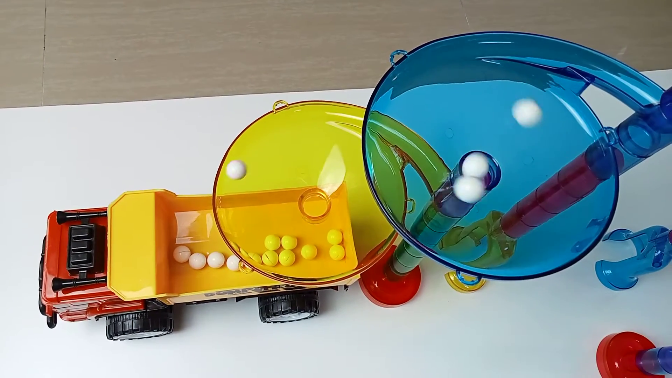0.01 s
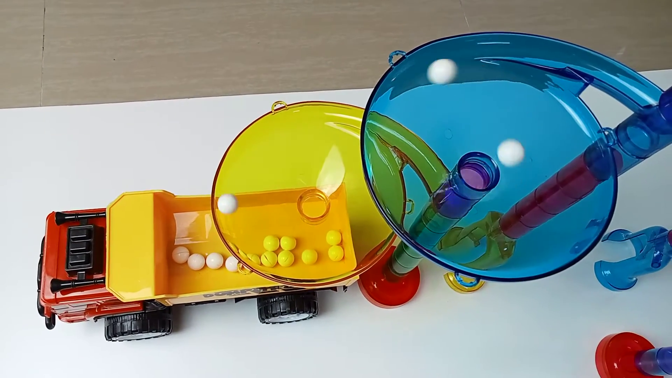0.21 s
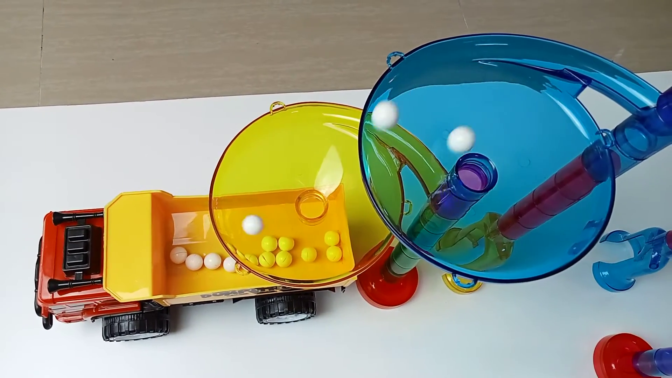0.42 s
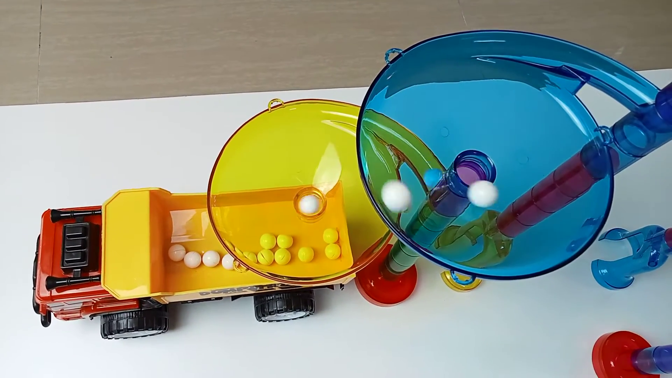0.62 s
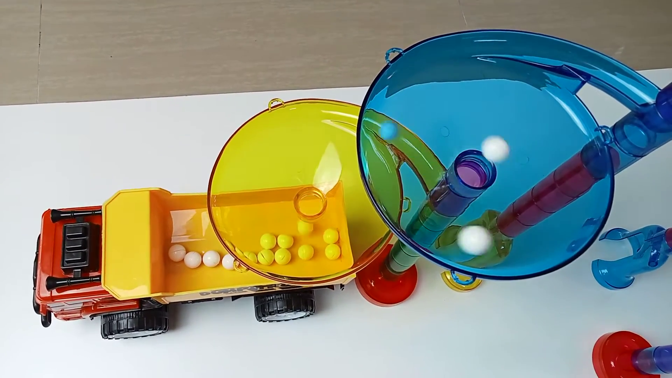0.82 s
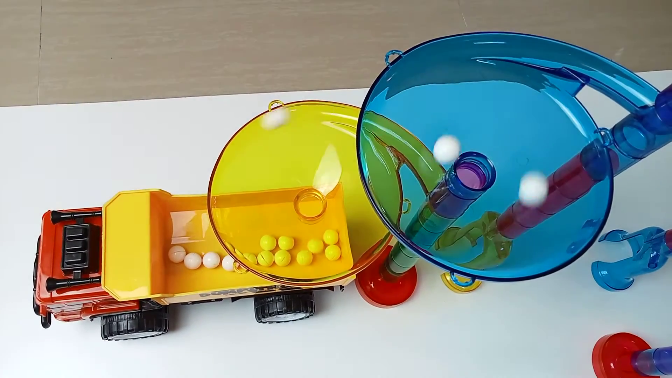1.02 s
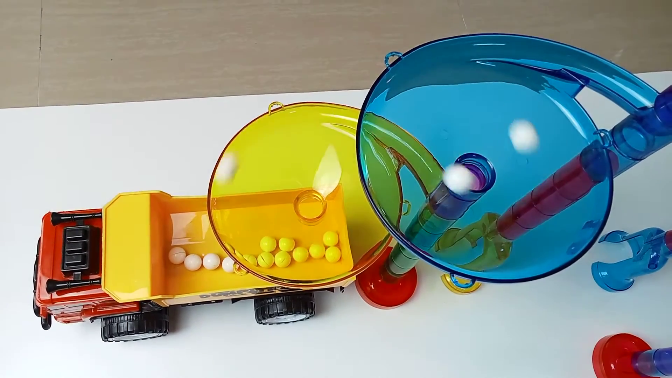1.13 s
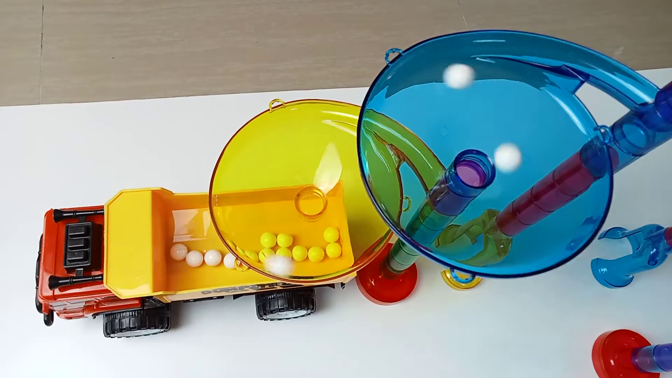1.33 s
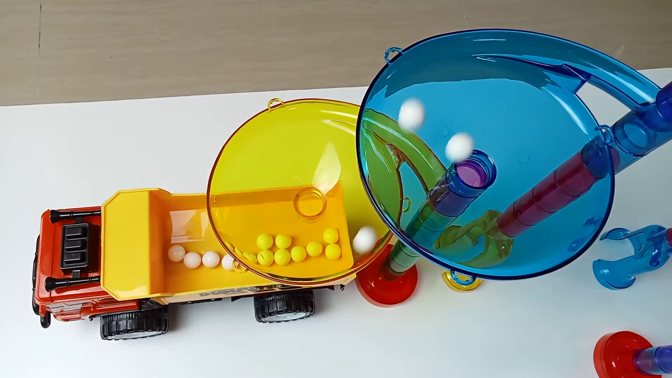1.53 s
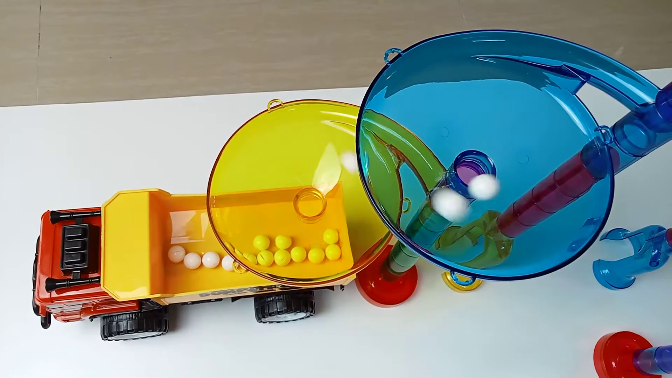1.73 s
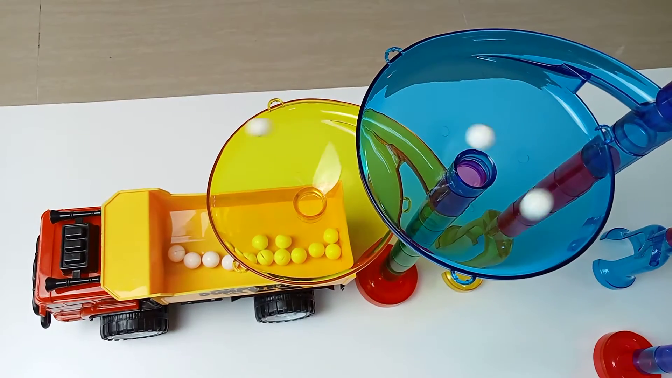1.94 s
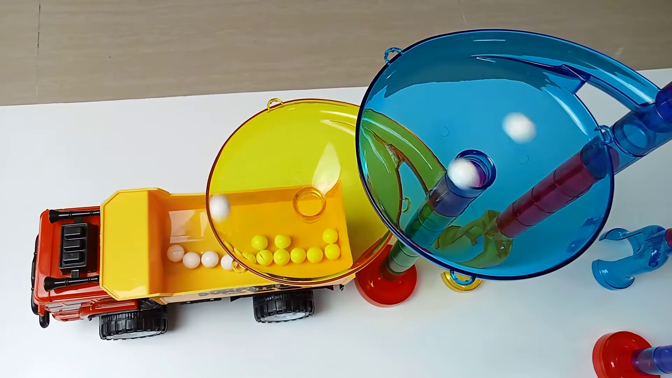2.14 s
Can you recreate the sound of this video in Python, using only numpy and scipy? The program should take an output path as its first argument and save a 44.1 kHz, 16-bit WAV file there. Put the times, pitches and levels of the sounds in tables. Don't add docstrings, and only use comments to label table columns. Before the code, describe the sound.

A hollow plastic ball runs through a toy: light ticks on the track from 0 to 0.33 s, a loud dense rattle down a chute at 0.36-0.53, bright uneven bounces until 0.73, brief clips near 0.78, then the loudest, hollow clack in the truck bed at 0.89, rebounding at 0.98. Afterwards, until about 2.2, circling balls softly rumble and tap plastic funnels over low room hum, close and reverberant.

```python
import sys
import numpy as np
from scipy import signal
from scipy.fft import rfft, irfft, next_fast_len
from scipy.io import wavfile
from scipy.ndimage import uniform_filter1d, map_coordinates

SR = 44100
rng = np.random.default_rng(int(sys.argv[2]) if len(sys.argv) > 2 else 0)


def transcribe(signal):
    frames = np.atleast_2d(signal).T
    limited = np.clip(frames, -1, 1)
    pcm = np.round(limited * 32767).astype(np.int16)
    wavfile.write(sys.argv[1], SR, pcm)


def volts_from_decibels(level):
    exponent = np.asarray(level, float) / 20
    return 10 ** exponent


N = 97020


# freq_hz [Hz], density_db [dB per Hz]
CHUTE_COLOUR = [(120, -76), (200, -78), (630, -5.5), (1210, -7), (1350, -4.5), (1680, 2.5), (3890, 6),
                (4750, -14), (15500, -25.5)]
# centre_hz [Hz], width_hz [Hz], boost_db [dB]
CHUTE_MODES = [(643, 37, 11.2), (804, 52, 8.9), (1368, 56, 12.5), (1544, 30, 4.5), (2052, 81, 9.9),
               (2380, 110, 6.6), (3600, 200, 1.7), (3850, 250, 6.3), (7390, 1600, 16.2)]
# freq_hz [Hz], density_db [dB per Hz]
TAP_COLOUR = [(200, -43), (700, -1.5), (1500, 1.5), (3800, -3), (5500, -28), (10500, -28), (15500, -52)]
# centre_hz [Hz], width_hz [Hz], boost_db [dB]
FUNNEL_MODES = [(1302, 30, 7.4), (1380, 55, 12.9), (1478, 98, 8.5), (1600, 27, 15.3), (2196, 43, 4.8),
                (2950, 88, 6.2), (7240, 930, 18.8)]


def track_ticks():
    # start_s [s], level_db [dB peak], ping_db [dB]
    hits = [(0.002, -33.5, -50), (0.048, -44, -60), (0.101, -36, -62), (0.109, -25.5, -67),
            (0.117, -34, -60), (0.138, -35, -46), (0.175, -35, -50), (0.192, -27, -54), (0.213, -15.5, -40),
            (0.227, -23, -30), (0.25, -51, -51), (0.269, -15, -38), (0.282, -13.5, -39),
            (0.291, -13.5, -23), (0.303, -12.5, -30), (0.333, -16.5, -48)]
    # freq_hz [Hz], density_db [dB per Hz]
    colour = [(120, -107), (200, -14), (677, -6.5), (1110, -12), (1510, 3.5), (3610, 5.5), (6020, -14.5),
              (7350, -10.5), (15500, -25)]
    # centre_hz [Hz], width_hz [Hz], boost_db [dB]
    modes = [(1440, 220, 8.5), (2220, 58, 4), (3830, 600, 4.5), (7300, 540, 10)]
    return knocks(hits, colour, modes, shake_s=0.061, rise_s=0.00039, wet_db=-9.0, sharp_db=4)


def chute_rattle():
    # start_s [s], level_db [dB peak], ping_db [dB]
    hits = [(0.358, 0, -21), (0.3705, -7, -27), (0.3755, -6, -42), (0.389, -15, -48), (0.403, -13, -34),
            (0.4147, -9, -38), (0.429, -16, -49), (0.436, -18, -49), (0.445, -5, -29), (0.459, -18, -50),
            (0.4825, -8, -41), (0.498, -21, -50), (0.51, -10, -43), (0.527, -20, -34)]
    return knocks(hits, CHUTE_COLOUR, CHUTE_MODES, shake_s=0.033, rise_s=0.00066, wet_db=-10.0, sharp_db=0.5)


def ramp_bounces():
    # start_s [s], level_db [dB peak], ping_db [dB]
    hits = [(0.55, -3, -8.5), (0.568, -17.5, -37), (0.577, -26, -54), (0.61, -15, -50), (0.618, -6, -26),
            (0.626, -24, -52), (0.637, -29, -62), (0.671, -10, -46), (0.725, -17, -55), (0.738, -28, -55),
            (0.706, -11, -12.5)]
    # freq_hz [Hz], density_db [dB per Hz]
    colour = [(120, -56), (200, -17), (1980, 2.5), (3820, -4), (5910, -21.5), (7350, -3.5), (10200, -28),
              (12900, -17.5), (15500, -21.5)]
    # centre_hz [Hz], width_hz [Hz], boost_db [dB]
    modes = [(665, 47, 9.9), (1010, 62, 9.2), (1590, 210, 4.7), (1958, 50, 10.1), (2184, 49, 9.9),
             (2580, 200, 6.4), (3974, 220, 9.9), (6860, 1500, 5.1)]
    return knocks(hits, colour, modes, shake_s=0.086, rise_s=0.00033, wet_db=-9, sharp_db=8.5)


def lip_clips():
    # start_s [s], level_db [dB peak], ping_db [dB]
    hits = [
        (0.763, -11.5, -60),
        (0.773, -10.5, -59),
        (0.781, -20.5, -51),
        (0.798, -10, -55),
    ]
    # freq_hz [Hz], density_db [dB per Hz]
    colour = [(180, -50), (300, -30), (968, -16), (1180, -10), (2250, 3), (4650, -13), (7250, -22.5),
              (15500, -29.5)]
    # centre_hz [Hz], width_hz [Hz], boost_db [dB]
    modes = [(1200, 200, 7.7), (2000, 70, 1.7), (7200, 560, 15.7)]
    return knocks(hits, colour, modes, shake_s=0.084, rise_s=0.00054, wet_db=-8.0, sharp_db=1)


def truck_bed_drop():
    # [dB, low body share]
    hits = [
        (.891, 1.5, -37, 8.5),
        (.8938, 6, -49, 4),
        (.9, -9, -60, -4),
        (.911, -27, -55, -13),
        (.9755, -2.5, -55, 12),
        (1.016, -33, -60, 20),
    ]
    # freq_hz [Hz], density_db [dB per Hz]
    colour = [(120, -51), (200, -50), (858, -3), (1650, -8), (2850, -3), (3610, -2.5), (4920, -24),
              (7480, -23.5), (15500, -30)]
    # centre_hz [Hz], width_hz [Hz], boost_db [dB]
    modes = [(477, 170, 13), (830, 180, 1.9), (1070, 110, 2.9), (1616, 220, 8.2), (2500, 230, 9.3),
             (2727, 130, 8.8), (2860, 150, 2.9), (3180, 200, 4.2), (7430, 1200, 16)]
    return knocks(hits, colour, modes, shake_s=0.034, rise_s=0.00071, wet_db=-2.5, sharp_db=4.5)


def wall_toks():
    # start_s [s], level_db [dB peak], pitch_hz [Hz]
    contacts = [(0.372, -11, 1380), (0.431, -18.5, 1380), (0.459, -17, 1420), (0.392, -11.5, 1390),
                (0.402, -22, 1370), (0.438, -34, 1400), (0.482, -28, 1370), (0.495, -24, 1450),
                (0.513, -14, 1410), (0.53, -17, 1400), (0.762, -14, 1200), (0.801, -22, 1200),
                (.4455, -3, 3850), (0.482, -1, 3700), (.5105, -7, 3850), (.7985, -19, 2150),
                (0.8915, 8, 2920), (1.6, -24, 3250), (.8925, -20.5, 708), (0.359, -5, 5170),
                (.377, -11, 1410), (2.066, -32.5, 710), (.894, -6, 970), (.975, -4, 938), (1.001, -11, 940),
                (1.049, -23, 1020), (1.144, -28, 1540), (1.156, -20, 1520), (1.269, -20, 1600),
                (1.166, -17.5, 1470), (1.175, -13, 1500), (1.193, -19, 914), (1.76, -20.5, 1426),
                (2.13, -20, 1520)]
    rise_s, cycles_to_60_db, wet_db = 0.0013, 25, -9.5
    out, t = np.zeros(N + SR), np.arange(SR // 10) / SR
    for start_s, level_db, pitch_hz in contacts:
        decay = volts_from_decibels(level_db + 4.5 - 60 * t * pitch_hz / cycles_to_60_db)
        tok = decay * (1 - np.exp(-t / rise_s)) * np.sin(2 * np.pi * pitch_hz * t)
        out[round(start_s * SR):][:len(t)] += tok
    return (out + volts_from_decibels(wet_db) * room(out)[:len(out)])[:N]


def funnel_bumps():
    # start_s [s], level_db [dB peak], ping_db [dB]
    hits = [(1.241, -37, -41), (1.266, -20, -39), (1.275, -23, -56), (1.305, -29, -65), (1.362, -26, -41),
            (1.41, -39, -61), (1.498, -43, -51), (1.596, -26.5, -57), (1.607, -30, -57), (1.629, -28, -43),
            (1.692, -35, -58), (1.757, -30, -62), (1.871, -32, -63), (1.882, -29.5, -60), (1.905, -31, -55),
            (1.948, -29, -53), (1.977, -26.5, -45), (2.06, -23, -50), (2.066, -19.5, -34),
            (2.119, -23, -52), (2.135, -28.5, -48), (2.194, -29.5, -44)]
    return knocks(hits, TAP_COLOUR, FUNNEL_MODES, shake_s=0.066, rise_s=0.0005, wet_db=-9, sharp_db=4)


def knocks(hits, colour, modes, shake_s, rise_s, wet_db, sharp_db):
    ball_hz, ball_t60_s, ball_db = 12650, 0.016, -6
    blow_peak = 4.5
    sharp_share = 0.5
    low_modes = signal.butter(1, 1800, fs=SR)
    dull = signal.butter(2, 4600, fs=SR)
    out, t = np.zeros(N + 2 * SR), np.arange(SR // 10) / SR
    ring = body(colour, modes)
    low_ring = signal.lfilter(*low_modes, signal.lfilter(*low_modes, ring))
    for start_s, level_db, ping_db, *low_db in hits:
        part = ring + (volts_from_decibels(sum(low_db)) - 1) * low_ring
        noise = rng.standard_normal(len(t)) * (1 - np.exp(-t / rise_s))
        noise[round(rise_s * SR)] = blow_peak
        soft = signal.lfilter(*dull, noise)
        sharp = volts_from_decibels(sharp_db) * (noise - soft)
        shake = soft * volts_from_decibels(-60 * t / shake_s) + sharp * volts_from_decibels(-60 * t / (sharp_share * shake_s))
        knock = signal.fftconvolve(shake, part)[:len(t)]
        knock = volts_from_decibels(level_db) * knock / np.abs(knock).max()
        phase = 2 * np.pi * ball_hz * rng.normal(1, 0.0045) * t + 0.053 * np.cumsum(noise)
        ping = np.sin(phase) * volts_from_decibels(ping_db + ball_db - 60 * t / ball_t60_s)
        blow = part * np.linalg.norm(knock) / np.linalg.norm(part)
        wet = room(blow + 0.3 * ping[:len(ring)])
        at = round((start_s - rise_s) * SR)
        out[at:][:len(t)] += knock + ping
        out[at:][:len(wet)] += volts_from_decibels(wet_db) * wet
    return out[:N]


def chute_skid():
    now = np.arange(N) / SR
    sliding = uniform_filter1d(1.0 * (now > 0.388) * (now < 0.535), size=600)
    rub = volts_from_decibels(-34.5) * rumble(CHUTE_COLOUR, CHUTE_MODES)
    return sliding * (rub + volts_from_decibels(-29) * rumble(CHUTE_COLOUR, [(1362, 22, 40)]))


def large_funnel_roll():
    # time_s [s], level_db [dB]
    roll = [(0, -31.5), (.09, -39), (.2, -30.5), (.34, -40.5), (.6, -35.5), (.85, -43), (1.15, -34),
            (1.3, -43.5), (1.45, -40.5), (1.53, -40.5), (1.62, -35.5), (1.75, -38.5), (1.85, -37.5),
            (2.0, -38), (2.2, -43)]
    # freq_hz [Hz], density_db [dB per Hz]
    colour = [(150, -54), (250, -26), (690, -13), (1400, -2), (2200, 1), (3900, -15), (5200, -46),
              (15500, -35)]
    level = volts_from_decibels(np.interp(np.arange(N) / SR, *np.transpose(roll)) - 1.5)
    return level * (rumble(colour, FUNNEL_MODES) + volts_from_decibels(-17) * specks())


def small_funnel_roll():
    # time_s [s], level_db [dB]
    roll = [(0, -47), (.3, -43), (.8, -43), (1.1, -39.5), (1.3, -36.5), (1.45, -41.5), (1.55, -42),
            (1.7, -45), (1.85, -43.5), (2.0, -44.5), (2.2, -38)]
    # freq_hz [Hz], density_db [dB per Hz]
    colour = [(150, -63), (250, -24.5), (690, -8.5), (1100, 2), (2200, -2), (3900, -13.5), (5200, -43.5),
              (15500, -40)]
    # centre_hz [Hz], width_hz [Hz], boost_db [dB]
    modes = [(623, 84, 8), (688, 66, 12.1), (970, 24, 10), (1073.5, 33, 12.5), (1183, 24, 14),
             (2060, 73, 3.3), (2450, 150, 7), (7130, 1600, 24)]
    return volts_from_decibels(np.interp(np.arange(N) / SR, *np.transpose(roll))) * rumble(colour, modes)


def specks():
    bursts = signal.fftconvolve(scattered(200, 6), volts_from_decibels(-np.arange(200) / 4))[:N]
    bursts = bursts * rng.standard_normal(N)
    return unit(signal.fftconvolve(bursts, body(TAP_COLOUR, FUNNEL_MODES[-1:]))[:N])


def rumble(colour, modes):
    bumps = scattered(1500, 3, signs=(-1, 1))
    z = signal.stft(0.72 * unit(bumps) + rng.standard_normal(N), nperseg=512)[2]
    patches = uniform_filter1d(rng.standard_normal(z.shape), size=4, axis=0)
    patches = uniform_filter1d(patches, size=10, axis=1)
    drive = signal.istft(z * volts_from_decibels(1.1 * unit(patches)), nperseg=512)[1][:N]
    seam = volts_from_decibels(2.8 * wobble(150))
    wall = signal.fftconvolve(drive * seam, body(colour, modes))[:N]
    return unit(wall + volts_from_decibels(-9.5) * room(wall)[:N])


def scattered(count, spread_db, signs=(1,)):
    strength = volts_from_decibels(spread_db * np.minimum(rng.exponential(1, count), 3)) * rng.choice(signs, count)
    return np.bincount(rng.integers(0, N, count), strength, N)


def body(colour, modes):
    f = np.fft.rfftfreq(8192, 1 / SR)
    gain = volts_from_decibels(along(colour, f))
    for centre_hz, width_hz, boost_db in modes:
        gain = gain * (1 + (volts_from_decibels(boost_db) - 1) / (1 + (2 * (f - centre_hz) / width_hz) ** 2))
    cepstrum = irfft(np.log(gain + 1e-5))
    cepstrum[1:len(f) - 1] *= 2
    cepstrum[len(f):] = 0
    h = irfft(np.exp(rfft(cepstrum)))[:len(f)]
    return h / np.linalg.norm(h)


def room(x):
    # freq_hz [Hz], t60_s [s]
    decay = [(300, 0.36), (1000, 0.51), (3000, 0.68), (7000, 0.65), (13000, 0.33)]
    hz, t, z = signal.stft(rng.standard_normal(SR // 2), SR, nperseg=256)
    tail = signal.istft(z * volts_from_decibels(-60 * t / along(decay, hz)[:, None]), SR, nperseg=256)[1]
    return signal.fftconvolve(np.pad(x, (300, 0)), tail / np.linalg.norm(tail))


def room_hum():
    # freq_hz [Hz], density_db [dB per Hz]
    colour = [(15, -67), (25, -18), (48, -12), (103, 1), (242, -12.5), (318, -10.5), (500, -13.5),
              (650, -66), (1100, -120)]
    # pitch_hz [Hz], level_db [dB]
    mains = [(240, -64.5), (483, -62.5)]
    hum = volts_from_decibels(-55.5) * unit(filtered(rng.standard_normal(N), lambda hz: volts_from_decibels(along(colour, hz))))
    for pitch_hz, level_db in mains:
        level = volts_from_decibels(level_db + 2.5 + 4.1 * wobble(7.82))
        hum += level * np.sin(2 * np.pi * pitch_hz * np.arange(N) / SR)
    return hum


def unit(x):
    return x / np.sqrt(np.mean(x ** 2) + 1e-20)


def along(points, hz):
    f, v = np.transpose(points)
    return np.interp(np.log(hz + 1), np.log(f + 1), v)


def wobble(rate):
    knots = rng.standard_normal(int(N * rate / SR) + 4)
    return map_coordinates(knots, [np.arange(N) * rate / SR])


def filtered(x, response):
    m = next_fast_len(N + SR // 4)
    return irfft(rfft(x, m) * response(np.fft.rfftfreq(m, 1 / SR)), m)[..., :N]


def scene():
    run = track_ticks() + chute_rattle() + chute_skid() + ramp_bounces() + lip_clips() + truck_bed_drop()
    circling = large_funnel_roll() + small_funnel_roll() + funnel_bumps()
    return (run + wall_toks() + circling + room_hum())[None]


def band_limit(x):
    return signal.sosfilt(signal.butter(12, 16650, fs=SR, output="sos"), x)


def record(dry):
    duck_s, duck_db, fall_s, back_s = 0.888, -6.5, 0.024, 0.55
    late = np.arange(N) / SR - duck_s
    falling = np.exp(np.minimum(late, 0) / fall_s)
    creeping_back = np.exp(-(late / back_s) ** 2)
    ducked = dry * volts_from_decibels(duck_db * np.where(late < 0, falling, creeping_back))
    overloaded = 0.93 * np.tanh(ducked / 0.93 + ducked ** 3 / 4)
    mix = filtered(overloaded, lambda hz: hz ** 2 / (hz ** 2 + 45 ** 2) / (1 + (hz / 15650) ** 80))
    return band_limit(mix)


dry = scene()
out = record(dry)
transcribe(out)
```